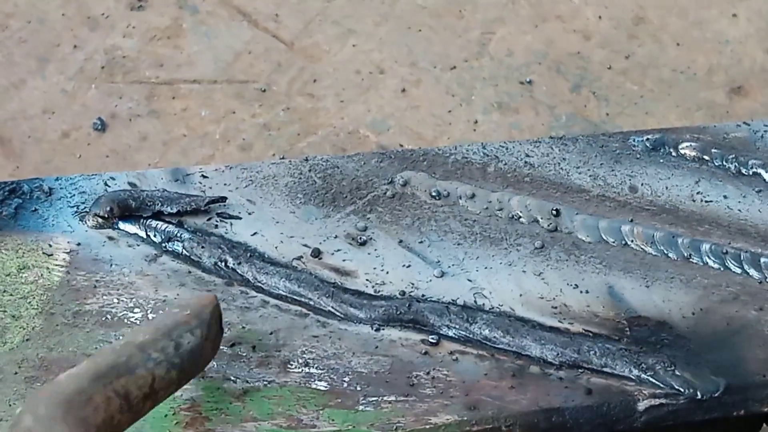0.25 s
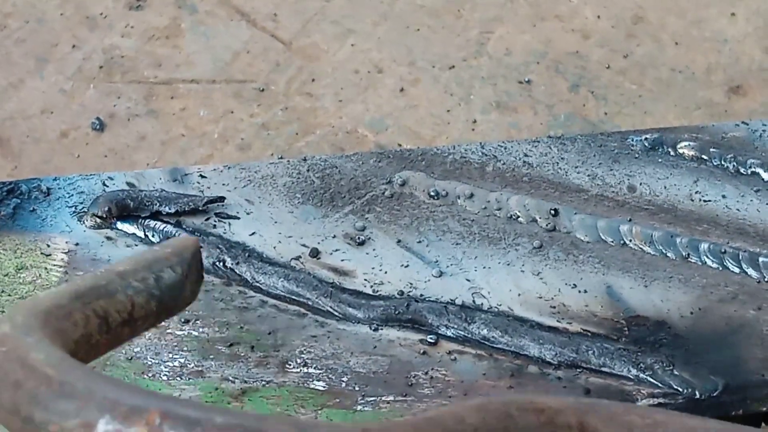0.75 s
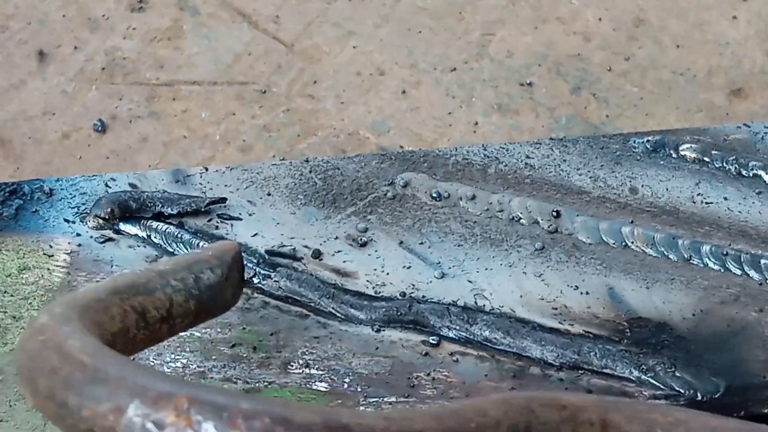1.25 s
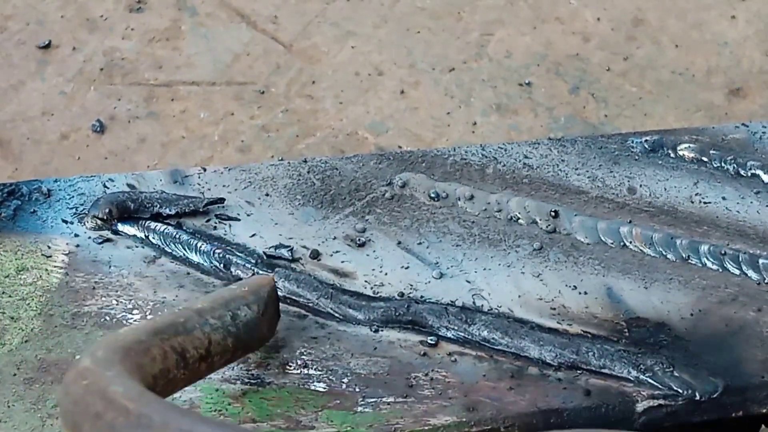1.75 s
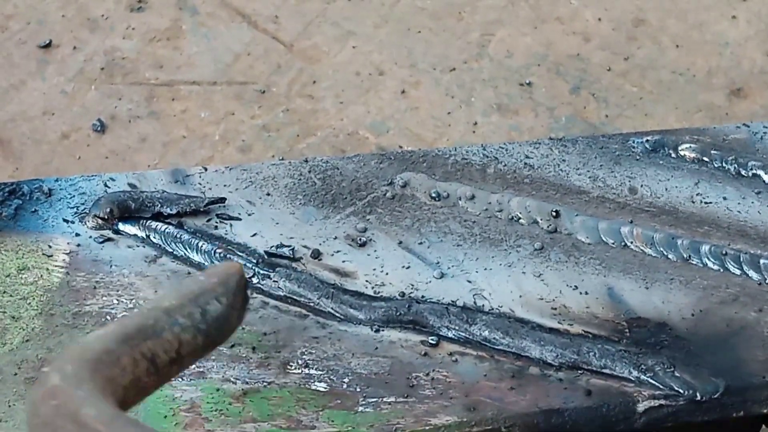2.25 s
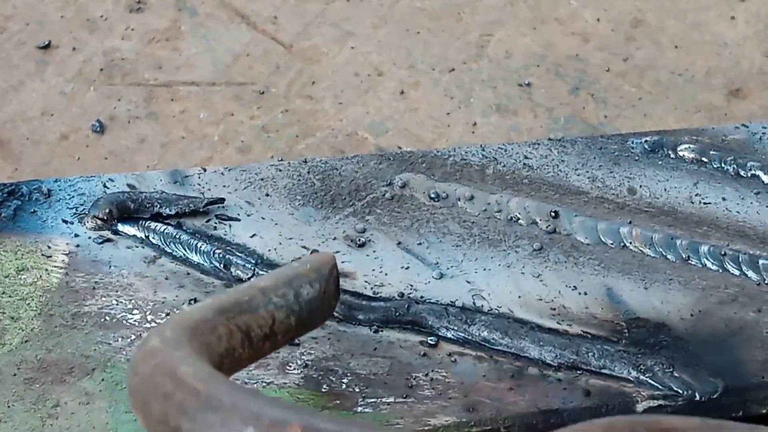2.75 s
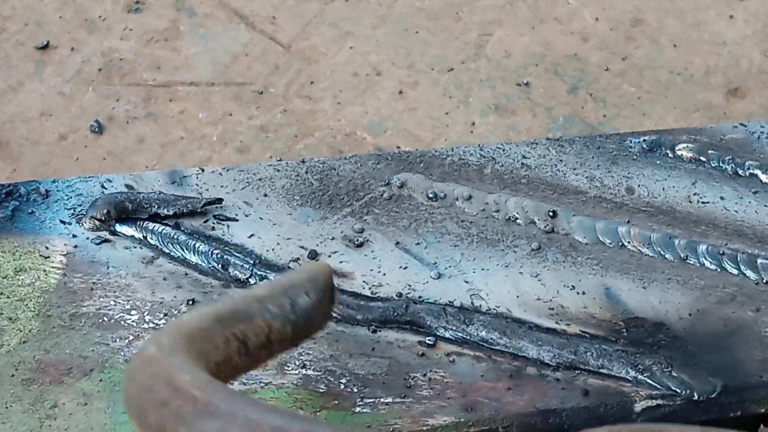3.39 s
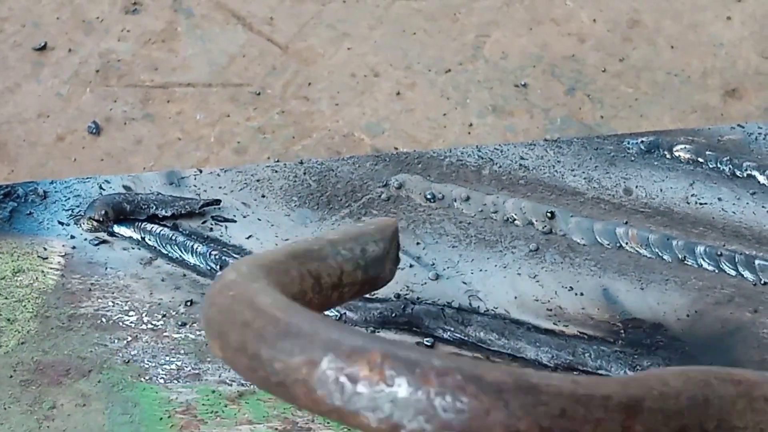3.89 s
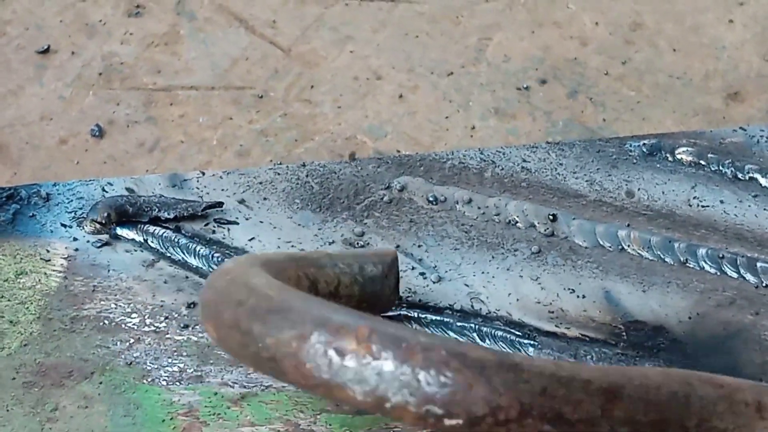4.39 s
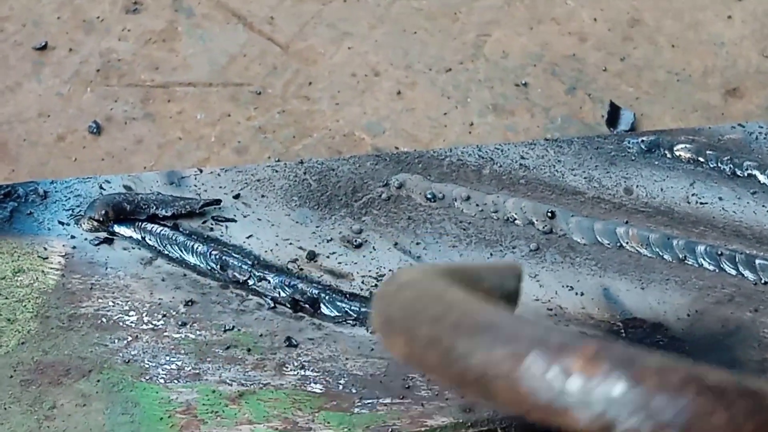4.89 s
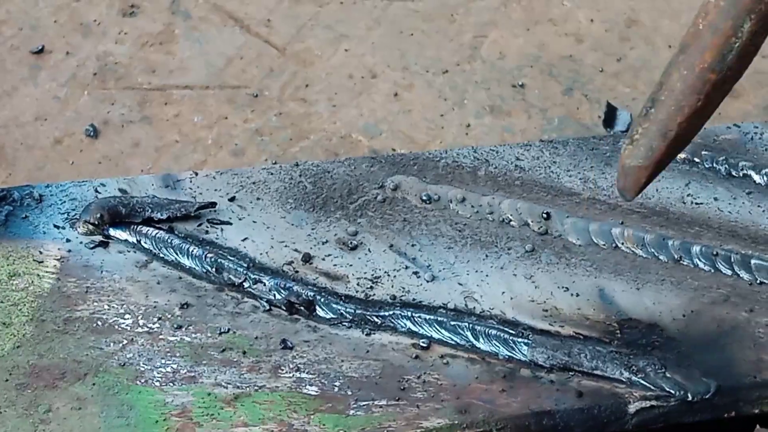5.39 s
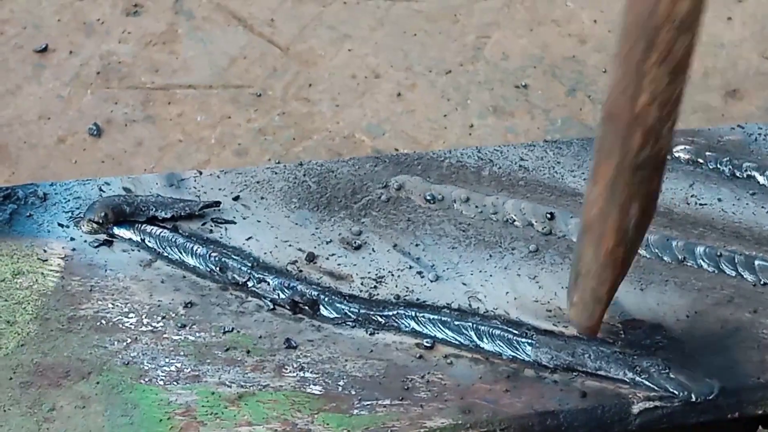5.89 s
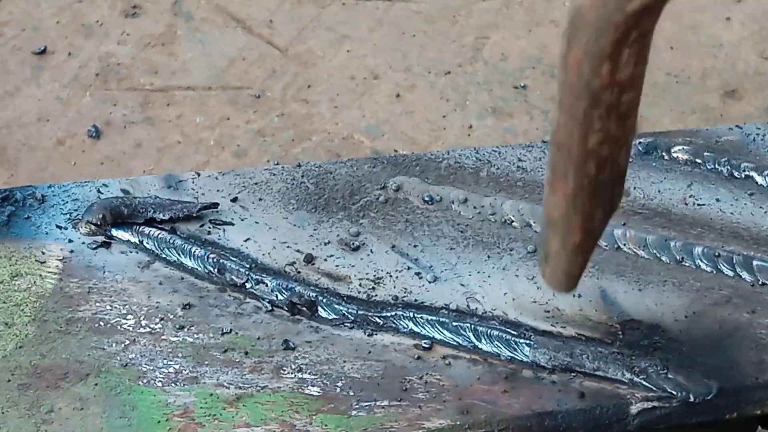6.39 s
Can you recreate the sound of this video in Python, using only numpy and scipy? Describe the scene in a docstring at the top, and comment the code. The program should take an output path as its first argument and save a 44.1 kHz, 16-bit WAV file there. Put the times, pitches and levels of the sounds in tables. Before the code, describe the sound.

Five unhurried hammer taps on a welded steel bar, each a sharp metallic clink, with flakes ticking down and a fan humming quietly.

```python
"""A fan hums at the back of a workshop; then, close to the microphone, a steel chipping hammer strikes.
Five blows knock slag off a weld bead on a steel bar that lies on a wooden bench.
Each crunches the crust, rings the bar, thumps the bench and may throw flakes that tick down.
Halfway through, a low rumble swells in the distance. One small microphone, mono, thin in the deep bass."""
import sys
import numpy as np
from scipy import signal
from scipy.fft import rfft, irfft, next_fast_len
from scipy.io import wavfile
from scipy.ndimage import map_coordinates

SR = 44100
rng = np.random.default_rng(int(sys.argv[2]) if len(sys.argv) > 2 else 0)


def to_wav(s):
    """Save 16-bit WAV."""
    ch = np.atleast_2d(s).T  # columns
    pcm = np.round(np.clip(ch, -1, 1) * 32767)  # PCM
    wavfile.write(sys.argv[1], SR, pcm.astype(np.int16))


N = 292824
TOP_HZ = 15950  # upper band limit


def amp(db):
    """Decibels to gain."""
    return 10 ** (np.asarray(db) / 20)


def unit(x):
    """x at rms 1."""
    return x / np.sqrt(np.mean(x ** 2) + 1e-20)


def along(points, hz):
    """(f/Hz, value) points read on a log frequency axis."""
    f, v = np.transpose(points)
    return np.interp(np.log(hz + 1), np.log(f + 1), v)


def filtered(x, gain):
    """x shaped by a gain that depends on frequency."""
    size = next_fast_len(len(x) + 8192)
    return irfft(rfft(x, size) * gain(np.fft.rfftfreq(size, 1 / SR)), size)[:len(x)]


def shaped(x, spectrum):
    """x through a curve of (f/Hz, gain/dB) points."""
    return filtered(x, lambda hz: amp(along(spectrum, hz)))


def noise(spectrum, size):
    """Noise of rms 1 with the given spectrum."""
    return unit(shaped(rng.standard_normal(size), spectrum))


def wobble(rate, size):
    """A smooth random curve with rate knots a second."""
    return map_coordinates(rng.standard_normal(1024), [np.arange(size) * rate / SR], mode="wrap")


def fade(t, t60):
    """Decay by 60 dB in t60 seconds."""
    return np.exp(-np.log(1000) * t / t60)


def rise(t, attack):
    """Build-up with a time constant of attack seconds."""
    return 1 - np.exp(-t / attack)


def add(track, s, sound):
    """Mix a sound into the track at time s."""
    part = track[round(s * SR):][:len(sound)]
    part += sound[:len(part)]


# Spectrum of the distant drone: f/Hz, relative density/dB
DRONE = [(50, -16.5), (85, -2.5), (110, 4.5), (135, 3.5), (180, -8.5), (300, -25.5), (800, -120)]
# Crests of its booms: t/s, level/dB
BOOMS = [(3.3, -59.5), (3.62, -52.5), (4.57, -58), (5.42, -54.5), (5.87, -63.5)]


def rumble(from_s=2.99, rise_s=0.24, until_s=5.1, fall_s=1.5, idle_db=-75.5, full_db=-61.5,
           boom_hz=109.5, boom_s=0.073):
    """Far off, a drone like traffic comes up, holds and sinks; now and then it booms on one note."""
    t = np.arange(N) / SR
    up = np.clip(np.minimum((t - from_s) / rise_s, 1 - (t - until_s) / fall_s), 0, 1)
    drone_db = idle_db + (full_db - idle_db) * up + 3 * wobble(10, N)
    swells = sum(amp(db) * np.exp(-((t - s) / boom_s) ** 2) for s, db in BOOMS)
    note = unit(np.sin(2 * np.pi * boom_hz * t + 0.33 * wobble(15, N)))
    return amp(drone_db) * noise(DRONE, N) + swells * note


# Tones of the fan: f/Hz, level/dB
FAN_TONES = [(161.5, -79), (323.5, -76), (453, -74.5), (566, -60), (1617, -79.5), (1698, -79),
             (1941, -81.5)]
# Its rush of air and its hiss: f/Hz, relative density/dB
FAN_RUSH = [(40, -31), (65, -7), (125, -12.5), (200, -13.5), (270, -13), (470, -0.5), (610, 0), (820, -1),
            (1040, -17.5), (1230, -4), (1500, -16.5), (1880, -15.5), (2150, -24.5), (3200, -33),
            (9000, -67)]
FAN_HISS = [(1500, 3.5), (2700, 3.5), (4500, -3.5), (6000, 0.5), (7300, -2.5), (8400, -13.5), (10500, -18),
            (13500, -22), (15200, -13.5)]


def fan(drift=0.0019, flutter=0.26, rush_db=-57, hiss_db=-75):
    """Behind the bench, tones follow the fan's unsteady shaft speed over rushing air and faint hiss."""
    shaft_time = np.cumsum(1 + drift * wobble(5, N)) / SR
    hum = np.zeros(N)
    for hz, db in FAN_TONES:
        eddies = 1 + flutter * (wobble(22, N) + 1j * wobble(22, N))
        tone = np.exp(2j * np.pi * (hz * shaft_time + rng.random()))
        hum += np.sqrt(2) * amp(db) * np.real(eddies * tone)
    rush = amp(rush_db + 1.04 * wobble(5.085, N)) * noise(FAN_RUSH, N)
    return hum + rush + amp(hiss_db) * noise(FAN_HISS, N)


def whirr(from_s=0.73, rise_s=0.1, t60=0.7, level_db=-76, centre_hz=4720, half_width_hz=130):
    """After the first blow a thin whirr swells and dies, perhaps a loosened flake spinning off."""
    track, t = np.zeros(N), np.arange(SR // 2) / SR
    white = rng.standard_normal(len(t))
    band = unit(filtered(white, lambda hz: 1 / (1 + ((hz - centre_hz) / half_width_hz) ** 2)))
    swell = np.minimum(t / rise_s, fade(t - rise_s, t60))
    add(track, from_s, amp(level_db) * band * swell)
    return track


# Flakes landing: t/s, relative level/dB
LANDINGS = [(0.9714, -71), (2.3084, -66), (2.3464, -71), (2.4034, -70), (4.2588, -48.5), (4.307, -50),
            (4.3745, -55.5), (4.478, -51.5)]
# Spectrum of brittle slag: f/Hz, relative density/dB
SLAG = [(1500, -8), (4500, -2.5), (8000, 1), (12500, -9.5), (15000, 0), (16000, -3.5)]


def flakes(gain_db=-4, tick_t60=0.012, echo_db=-22, echo_t60=0.28, mean_hop_s=0.0058, hop_loss_db=6):
    """Brittle flakes tick as they land and hop on, weaker each time."""
    track, t = np.zeros(N), np.arange(SR // 5) / SR
    decay = fade(t, tick_t60) + amp(echo_db) * fade(t, echo_t60)
    for s, db in LANDINGS:
        # every flake has its own shape, so its own peaks in the treble
        peaks = list(zip(np.linspace(2000, TOP_HZ, 16), 4 * rng.standard_normal(16)))
        for hop in range(3):
            tick = unit(shaped(noise(SLAG, len(t)), peaks))
            add(track, s, amp(db + gain_db - hop_loss_db * hop) * tick * decay)
            s += mean_hop_s * rng.exponential()
    return track


def crack(t, drive, gain_db=9, t60=0.07):
    """The slag cracks, as loud as the contact is strong in the top treble."""
    return amp(along(drive, TOP_HZ) + gain_db) * noise(SLAG, len(t)) * fade(t, t60)


# The tip's drag before it bites: start t/s, end t/s, level at full pressure/dB
DRAG = (2.102, 2.126, -59.5)
# Spectrum of the steel's crowd of weak modes, in scrape, crunch and shimmer: f/Hz, relative density/dB
CROWD = [(300, -36.5), (950, -16.5), (1170, -44), (1400, -6), (1650, -8.5), (1850, -17), (2200, -11),
         (2550, -3), (3200, -11), (8000, -12), (11000, -33), (13000, -23), (14500, -16), (16000, -38)]


def scrape(rough_db=3):
    """The tip drags briefly over the crust, pressing ever harder."""
    track = np.zeros(N)
    start, end, db = DRAG
    size = round((end - start) * SR)
    pressure = np.linspace(0.3, 1, size)
    add(track, start, amp(db + rough_db * wobble(300, size)) * pressure * noise(CROWD, size))
    return track


def crunch(t, drive, attack=0.00026, t60=0.11, echo_db=-9, echo_t60=0.19):
    """Slag crunches between hammer and bar, and the workshop returns a faint echo."""
    burst = shaped(noise(CROWD, len(t)), drive)
    direct = fade(t, t60) * rise(t, attack)
    echo = amp(echo_db) * fade(t, echo_t60) * rise(t, 0.003)
    return burst * (direct + echo)


# Modes of the wooden bench: f/Hz, relative level/dB, t60/s
BENCH_MODES = [(126, -4.5, 0.089), (181.4, -5, 0.12), (214.4, 4, 0.05), (254, -8.5, 0.24),
               (331, -12.5, 0.072), (547, 0, 0.038)]
# The bar jolting on the bench: f/Hz, relative density/dB
THUD = [(30, -39), (80, -9), (150, 3.5), (300, -8), (700, -20), (1170, -2), (1500, -6.5), (2500, -40)]


def thump(t, attack=0.0025, thud_db=1, thud_t60=0.062):
    """The bench takes the blow in a few low modes and a short, dull thud."""
    modes = sum(amp(db) * np.sin(2 * np.pi * hz * t) * fade(t, t60) for hz, db, t60 in BENCH_MODES)
    thud = amp(thud_db) * noise(THUD, len(t)) * fade(t, thud_t60)
    return (modes + thud) * rise(t, attack)


# Decay of the steel's weak modes: f/Hz, t60/s
CROWD_T60 = [(1000, .18), (2000, 0.31), (4000, 0.4), (8000, 0.28), (15000, .17)]


def shimmer(t, mode_hz, drive, attack=0.0029):
    """Many weak modes sound between the strong ones, each driven by chance."""
    share = amp(along(CROWD, mode_hz))
    gains = share / np.linalg.norm(share) * amp(along(drive, mode_hz))
    gains *= rng.rayleigh(size=len(mode_hz))
    modes = np.zeros(len(t))
    for hz, gain, t60 in zip(mode_hz, gains, along(CROWD_T60, mode_hz)):
        modes += gain * np.sin(2 * np.pi * (hz * t + rng.random())) * fade(t, t60)
    return modes * rise(t, attack)


# Strong modes of bar and hammer: f/Hz, relative level/dB at blend 0, 0.5 and 1, t60/s
STEEL_MODES = [(830, -12, -9, -24, 0.12), (990, -12, -9, -28, 0.1), (1110, -8, -3, -21, 0.1),
               (1174, 0, -5, -12, 0.31), (1312, -2, -5, -15, 0.42), (1415, -9, -35, -42, 0.3),
               (1520, -7, -2, -2, 0.12), (1582, -1, -1, 4, 0.48), (1624, -5, -6, -13, 0.38),
               (1685, -8, -11, -6, 0.25), (1846, -22, -24, -9, 0.9), (1879, -10, -6, -19, 0.34),
               (2003, -16, -13, -1, 0.52), (2379, -11, -17, -13, 0.32), (2497, 2, -3, -10, 0.28),
               (2625, -3, -8, -6, 0.22), (2705, -9, -8, -19, 0.24), (2961, -14, -5, -17, 0.33),
               (3135, 1, -8, -20, 0.36), (3376, -32, -18, -9, 0.38), (3490, -15, -13, -8, 0.3),
               (3855, -2, -5, 2, 0.33), (3978, -4, -7, -23, 0.28), (4180, -13, -7, -19, 0.35),
               (4323, -24, -22, -15, 0.34), (4500, -40, -40, -35, 1.2), (4614, -2, 2, -1, 0.22),
               (5118, -8, -26, -13, 0.32), (5426, -10, -18, -9, 0.4), (5660, -1, -4, -3, 0.2),
               (5766, -23, -16, -16, 0.46), (5911, -14, -17, -5, 0.32), (6148, -20, -16, -3, 0.32),
               (6370, -1, 0, -11, 0.25), (6912, -8, -32, -6, 0.27), (7192, -4, -6, 0, 0.27),
               (7634, -9, -12, -7, 0.24), (7897, -12, -17, -12, 0.2), (8082, -21, -11, -7, 0.36),
               (8333, -12, -7, -1, 0.22), (8810, -5, -5, -6, 0.22), (8993, -3, -5, -10, 0.24),
               (9130, -21, -21, -11, 0.25), (9485, -9, -10, -6, 0.22), (9792, -6, -16, -4, 0.2),
               (10290, -10, -10, -27, 0.23), (11000, -18, -20, -14, 0.25), (11490, -26, -30, -14, 0.22),
               (14330, -16, -26, -8, 0.2), (14560, -12, -16, -22, 0.15), (15230, -15, -15, 0, 0.18),
               (15350, -15, -3, -21, 0.2)]


def ring(t, blend, drive, scatter_db=1, waver=0.087, attack=0.0041):
    """The steel rings clearly; blend (0-1) sets which of its tones the contact brings out."""
    modes = np.zeros(len(t))
    for hz, *db_by_blend, t60 in STEEL_MODES:
        db = np.interp(blend, [0, 0.5, 1], db_by_blend) + along(drive, hz)
        db += scatter_db * rng.standard_normal()
        # each ringing tone wavers slightly in loudness and phase
        size, phase = 1 + waver * wobble(60, len(t)), waver * wobble(55, len(t))
        tone = size * np.sin(2 * np.pi * (hz * t + rng.random()) + phase)
        modes += np.sqrt(2) * amp(db) * tone * fade(t, t60)
    return modes * rise(t, attack)


# What every contact passes to the steel: f/Hz, gain/dB
CONTACT = [(1500, -0.5), (2700, -9), (4800, -11), (7200, -5), (11000, -6), (14500, -8.5)]


def contact_drive(strength_db, tilt_db, tip_hz, lift_db, tilt_from_hz=1500, tip_octaves=0.43):
    """One contact's (f/Hz, gain/dB) curve: the tilt sets its brightness, the tip favours one range."""
    hz = np.geomspace(tilt_from_hz, TOP_HZ, 32)
    brightness = tilt_db * np.log2(hz / tilt_from_hz)
    resonance = lift_db * np.exp(-0.5 * (np.log2(hz / tip_hz) / tip_octaves) ** 2)
    return list(zip(hz, strength_db + along(CONTACT, hz) + brightness + resonance))


# Hammer contacts, four of them in the second blow: t/s, blend of ringing tones/0-1, strength/dB,
# tilt/dB per octave, tip resonance f/Hz, its lift/dB, relative crunch level/dB, thump gain/dB
STRIKES = [(0.6687, 0.13, -44.5, 0, 2520, 9.5, 4, -48), (2.117, 0, -45, -8, 2520, 3, 3, -70),
           (2.1255, 0.07, -36, -4, 2450, -4, -18, -49), (2.161, 0.05, -52, -4.5, 2460, 10, 2.5, -61),
           (2.3, 0, -58.5, -5.5, 2920, 8, 1, -80), (3.374, 0, -35.5, -2, 2740, 4.5, 2, -44),
           (4.0541, 0.41, -33.5, -1.74, 2900, 0, 4.5, -37), (6.2428, .98, -22.5, -6, 4900, 12, 0, -33)]


def hammer(shimmer_db=-4, crunch_gain_db=3, weak_count=170):
    """Close to the microphone, the bent hammer cracks the slag, rings the steel and thumps the bench."""
    track, t = np.zeros(N), np.arange(SR * 3 // 5) / SR
    # a flat bar's higher modes lie about evenly along the frequency axis
    weak_hz = 2000 + (TOP_HZ - 2000) * (np.arange(weak_count) + rng.random(weak_count)) / weak_count
    for s, blend, strength_db, tilt_db, tip_hz, lift_db, crunch_db, thump_db in STRIKES:
        drive = contact_drive(strength_db, tilt_db, tip_hz, lift_db)
        steel = ring(t, blend, drive) + amp(shimmer_db) * shimmer(t, weak_hz, drive)
        slag = amp(crunch_gain_db + crunch_db) * crunch(t, drive) + crack(t, drive)
        add(track, s, steel + slag + amp(thump_db) * thump(t))
    return track


def scene():
    """One listening point: the bench close by, the fan behind it, the rumble far off."""
    at_bench = hammer() + flakes() + scrape() + whirr()
    return (at_bench + fan() + rumble())[None]


def record(dry, low_hz=50):
    """The small microphone loses the deep bass, and the recorder cuts off above its band limit."""
    bass_cut = signal.butter(2, low_hz, "highpass", fs=SR, output="sos")
    band_limit = signal.ellip(12, 0.1, 90, TOP_HZ, fs=SR, output="sos")
    return signal.sosfilt(band_limit, signal.sosfilt(bass_cut, dry))


dry = scene()
out = record(dry)
to_wav(out)
```